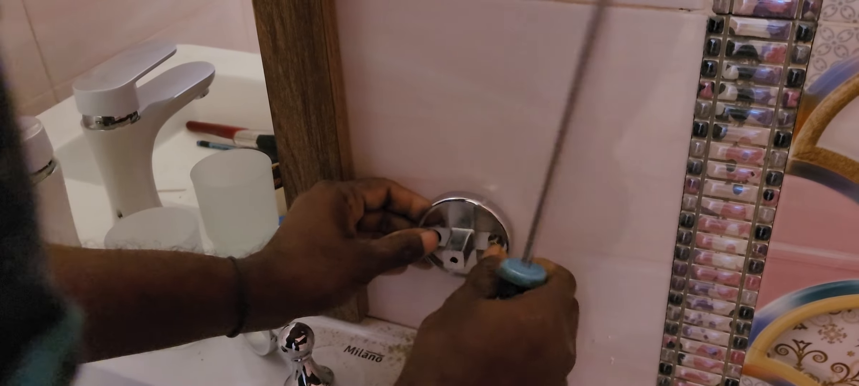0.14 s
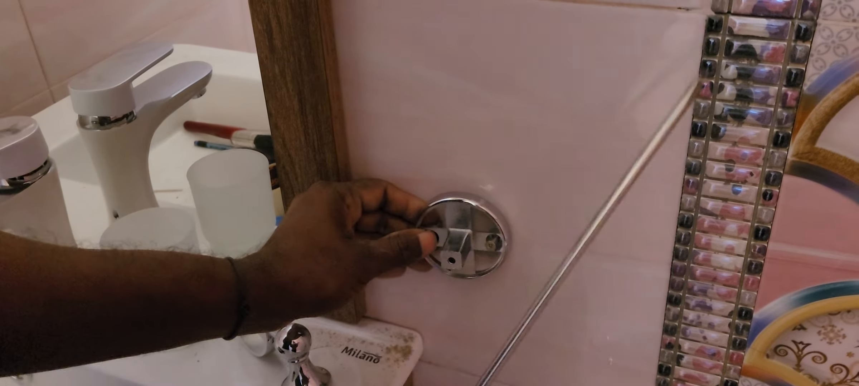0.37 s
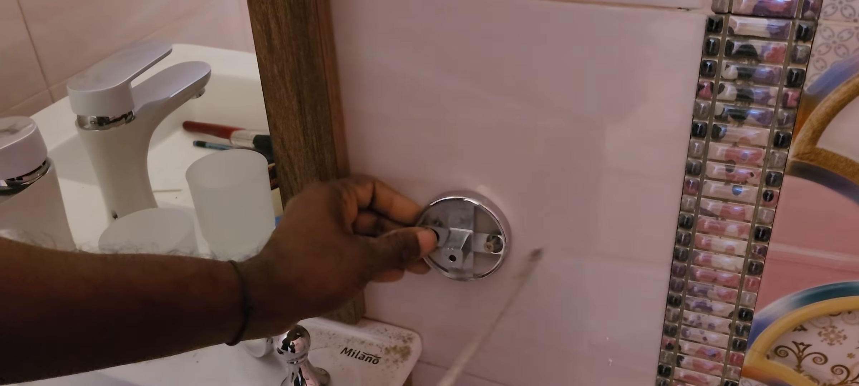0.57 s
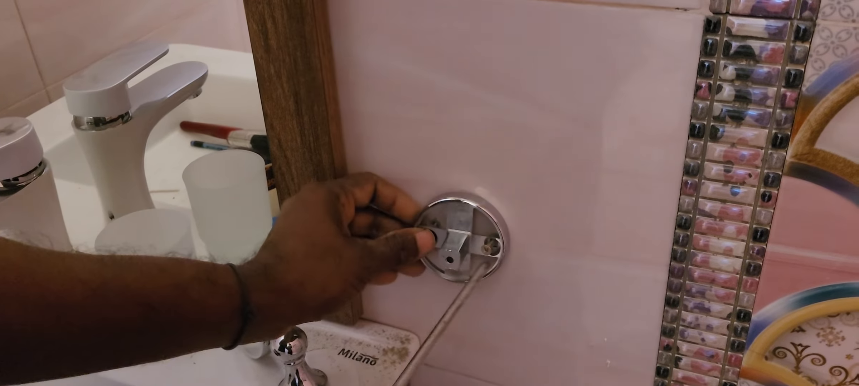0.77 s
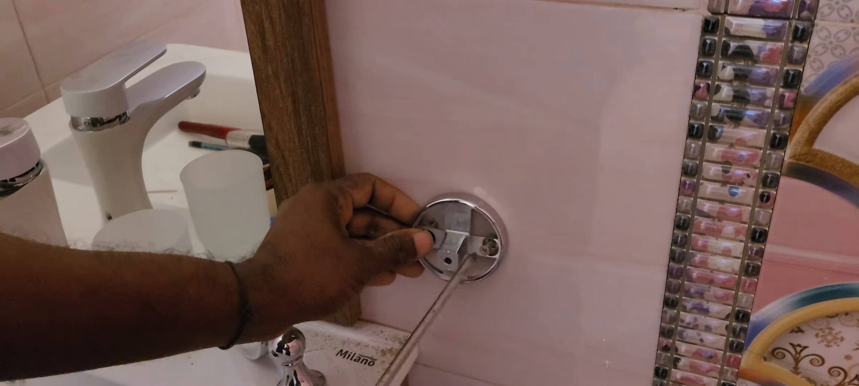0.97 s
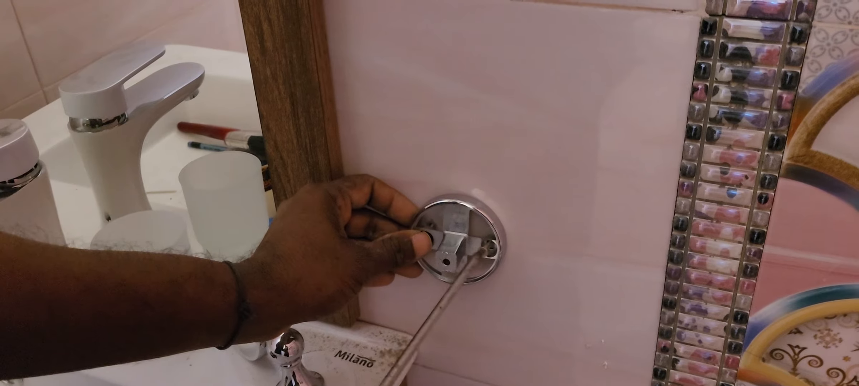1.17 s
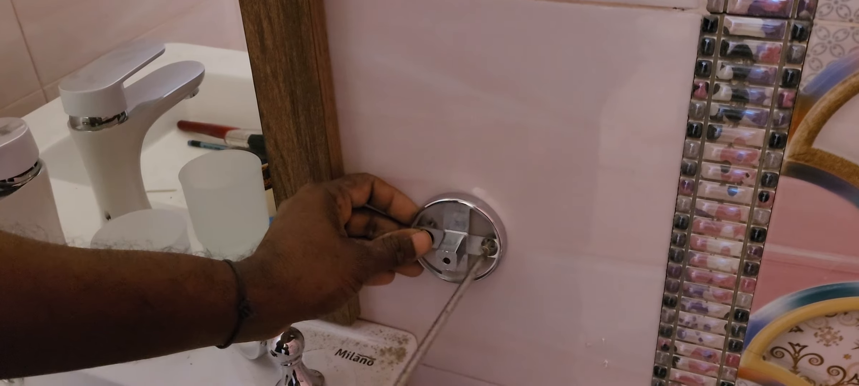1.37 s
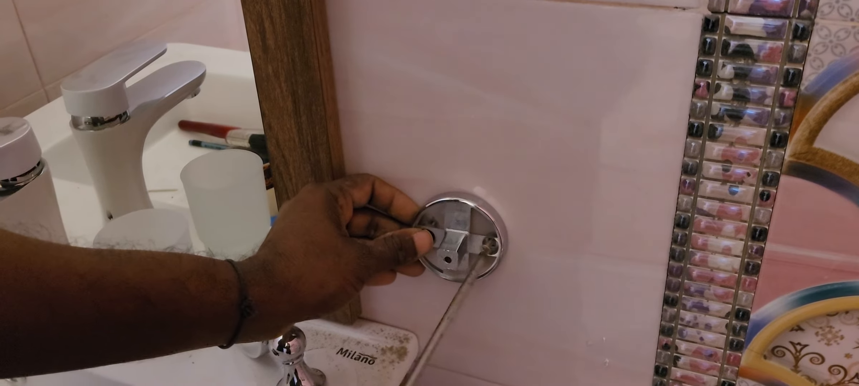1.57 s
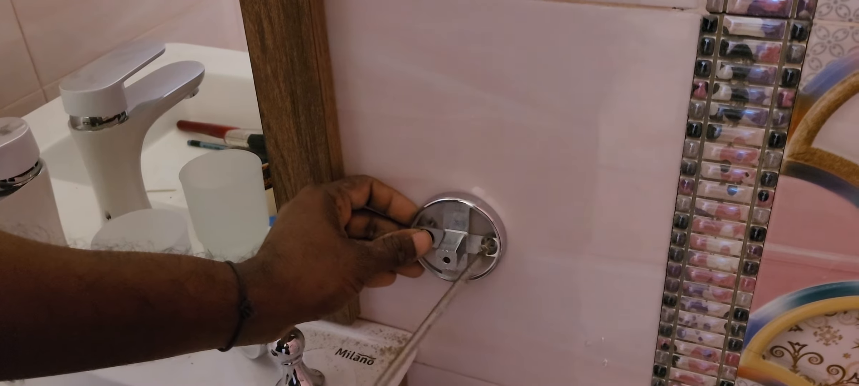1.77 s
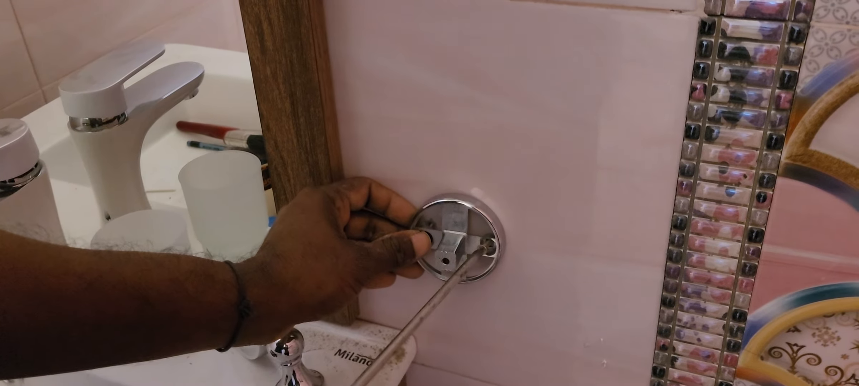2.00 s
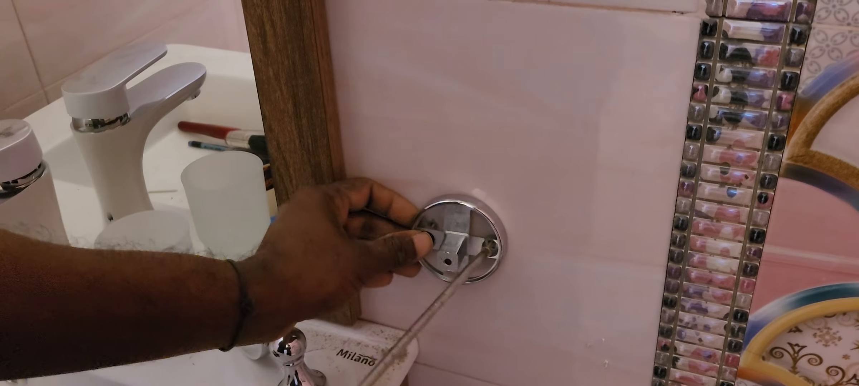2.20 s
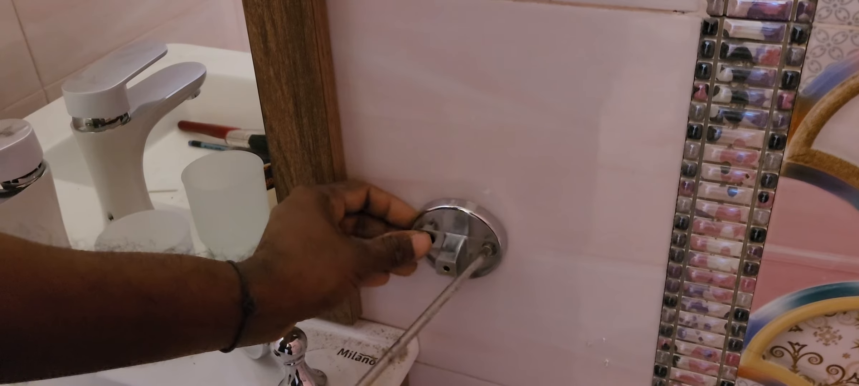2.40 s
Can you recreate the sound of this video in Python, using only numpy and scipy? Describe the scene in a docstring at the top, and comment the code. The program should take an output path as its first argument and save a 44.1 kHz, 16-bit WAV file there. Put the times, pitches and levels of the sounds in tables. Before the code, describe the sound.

A screwdriver touches a small metal wall plate in a tiled bathroom, heard close. Sharp, bright ticks come at 0.1, 0.55 and 0.7 seconds, while a muffled low rumble swells, strongest around 0.4 to 0.8, with thin hiss and a faint high whistle, fading by 1.3. Faint ticks follow, then clicks at 1.92 and 2.13 and a louder ringing clink at 2.37, with soft wall thuds.

```python
"""Screwdriver on a wall plate

A screwdriver tip taps and slips on a screw in a small metal wall plate, in a tiled bathroom.
Each touch is a noise grind, a ringing knock and the plate's modes; three later ones also thud in the wall.
Under them a low rumble, perhaps a vehicle passing outside, swells and fades as noise through the
room's low resonances. Thin hiss with faint whistles, one of them gliding, lies on top; all of it
is noise too, like the quiet room tone that stays below.
"""
import sys
import numpy as np
from scipy import signal
from scipy.fft import rfft, irfft
from scipy.io import wavfile

SR = 44100
rng = np.random.default_rng(int(sys.argv[2]) if len(sys.argv) > 2 else 0)


def file_out(sig):
    """Save sig as 16-bit WAV at sys.argv[1]."""
    # one column per channel
    cols = np.atleast_2d(sig).T
    # limit, then scale
    lim = np.clip(cols, -1, 1)
    pcm = np.round(lim * 32767).astype(np.int16)
    wavfile.write(sys.argv[1], SR, pcm)


def linear_from_db(decibels):
    """Turn decibels (scalar or array-like) into linear amplitude factors; 0 gives 1."""
    return 10 ** (np.asarray(decibels, float) / 20)


N = 108045

# touches of the tip: t/s, level/dB, centre f/Hz, half spread/octaves, grind time constant/s,
# knock f/Hz, knock level re grind/dB, its ring re knock/dB, plate level re touch/dB, left minus right/dB
TOUCHES = [(0.0646, -28, 9800, 0.6, 0.0013, 8260, -10, -27, -23, -4.5),
           (.137, -37, 13000, 0.24, 0.00091, 11800, 1, -51, -43.5, -14),
           (0.141, -27.5, 8700, 0.94, 0.004, 8060, 3, -23, -42.5, -1.5),
           (0.543, -28, 8050, 1.2, 0.0035, 3580, 13.5, -32, -39, -1.5),
           (0.6755, -31.5, 11200, 0.64, 0.0016, 6400, -3, -30, -29, -2),
           (1.195, -55, 6000, 0.68, .002, 5800, -10, -22, -35, -3),
           (1.279, -40.5, 6940, 0.23, 0.0026, 5050, 7.5, -36, -23, -1),
           (1.821, -59.5, 9100, 0.88, 0.0073, 8400, -10, -30, -37, -3),
           (1.912, -46.5, 7900, .8, 0.011, 6200, -10, -33, -37, -5),
           (1.9218, -26.5, 7450, 1.1, 0.0027, 5340, 2, -28, -24, 3.5),
           (1.93, -28, 5900, 0.77, 0.0025, 3700, 0, -25, -41, -9),
           (2.129, -28, 8300, 0.46, 0.0026, 5200, 0.5, -27, -25, -1.5),
           (2.259, -57, 11460, 0.77, 0.055, 8000, -8, -30, -20, -2),
           (2.3658, -24, 4900, 0.92, 0.0049, 8500, 7, -35, 5.5, -5)]
# mode clusters of the metal plate: f/Hz, width/Hz, relative level/dB, t60/s
PLATE_MODES = [(2820, 290, -10, 0.12), (3210, 120, 2.5, 0.12), (3077, 110, 4.5, 0.1), (3800, 320, -13, .15),
               (4130, 250, 0.5, 0.17), (4620, 260, 8, 0.12), (5260, 400, -6, 0.064), (6930, 100, -10, .15),
               (7800, 88, -6, 0.13), (10300, 200, -15, 0.59), (11420, 60, -24, 0.26),
               (11820, 51, -5, 0.099), (12600, 40, -16, .2), (13110, 52, -16, .4), (13500, 40, -25, .4),
               (14570, 70, -9, 0.088)]
# low modes of the wall: f/Hz, relative level/dB, t60/s
WALL_MODES = [(173.3, -2, 0.58), (207, -8.5, 0.45), (243, 1.5, 0.24), (390.7, -1, 0.29)]
# the wall thuds with three of the later touches: t/s, level/dB
WALL_THUDS = [(1.926, -51.5), (2.128, -46.5), (2.37, -45.5)]
# decay of the bathroom: f/Hz, t60/s
BATHROOM_T60 = [(300, 1), (2000, 0.66), (5000, 0.52), (10000, 0.27), (16000, 0.39)]
# swells of the rumble: t/s, bass level/dB, body level/dB, upper body level/dB
RUMBLE_LEVELS = [(0.0, -51, -36, -47), (0.14, -48.5, -39.5, -54.5), (0.17, -47, -27.5, -42.5),
                 (0.2, -37.5, -28, -46.5), (0.27, -43, -23.5, -39.5), (0.37, -37, -23.5, -41.5),
                 (0.4, -40, -25, -33.5), (0.43, -33, -17, -31.5), (0.51, -37, -20.5, -34.5),
                 (0.57, -36, -16, -33), (0.67, -31.5, -19, -37.5), (0.78, -35, -20.5, -41),
                 (0.81, -44, -20.5, -45), (0.85, -35, -26.5, -43), (1.25, -49.5, -43, -57.5),
                 (1.52, -80, -50, -65.5), (2.13, -76, -64.5, -65), (2.45, -75, -51, -61)]
# swells of the hiss: t/s, lower treble level/dB, upper treble level/dB
HISS_LEVELS = [(0.0, -60.5, -68), (0.124, -54, -68), (0.242, -52, -58), (0.324, -55, -59.5),
               (0.642, -52.5, -54.5), (0.844, -51.5, -58), (1.032, -58.5, -62), (1.408, -76, -99),
               (1.5, -94, -92)]
# colour of each rumble and hiss band: f/Hz, relative level per Hz/dB
BASS_COLOUR = [(12, -63), (20, -56), (37, -20), (59, -14.5), (86, -2.5), (124, 3), (140, -7), (180, -26),
               (310, -120)]
BODY_COLOUR = [(76, -42.5), (130, -15.5), (227, -2.5), (352, -3), (403, -6.5), (480, -8), (650, -24.5),
               (840, -39), (1430, -120)]
UPPER_BODY_COLOUR = [(350, -21), (600, 0.5), (690, 0), (792, 1.5), (959, -3), (1300, -17), (1690, -66),
                     (2860, -120)]
LOWER_TREBLE_COLOUR = [(710, -16), (1200, -5.5), (1530, -4), (1630, -4.5), (2890, -11.5), (3340, -15),
                       (4160, -13.5), (4550, -10), (6200, -22), (8060, -47), (13600, -120)]
UPPER_TREBLE_COLOUR = [(3530, -14), (6000, -5.5), (6910, -1.5), (8850, -18), (10900, -13), (12800, -23.5),
                       (13100, -8.5), (13900, -16), (15800, -30)]
# low resonances of the room: f/Hz, width/Hz, lift/dB
ROOM_BOOMS = [(55.8, 7.6, 6.5), (98, 5, -1), (177.6, 4, 6.5), (219, 4.6, -3.5), (233.2, 5.6, 16.5),
              (269.8, 5.1, 11), (345.94, 4.4, 11), (360, 29, 3), (369, 12, 3), (442.5, 4.9, 14.5),
              (491.5, 6.9, 10.5), (550, 6.3, 13.5), (618.6, 9.8, 11.5), (717, 7.2, 2), (773, 9.2, 4.5),
              (867, 6, 9), (936, 10, 11), (975, 12, 9.5)]
# faint steady-pitched whistles in the hiss: f/Hz, width/Hz, lift/dB
HISS_WHISTLES = [(2870, 60, 5), (4600, 90, 7), (6260, 60, 5), (6900, 90, 7), (13500, 130, 9)]
# one thin whistle holds, climbs slowly, then drops quickly and fades: t/s, f/Hz, level/dB
WHISTLE_GLIDE = [(.3, 10800, -89), (.35, 10800, -61), (.45, 10800, -74), (.63, 10860, -71),
                 (.85, 10950, -74), (1.0, 11150, -74), (1.11, 11550, -73), (1.16, 10600, -78),
                 (1.19, 10000, -93)]
# colour of the room tone: f/Hz, relative level per Hz/dB
ROOM_TONE_COLOUR = [(12, -78), (20, -35), (93, -12), (133, -20.5), (233, 2.5), (308, -1), (365, 1),
                    (586, -12.5), (819, -23), (942, -12.5), (1210, -16), (1430, -12), (2240, -17.5),
                    (2500, -18.5), (3910, -27.5), (4760, -22), (15800, -55.5)]
# hums within the room tone: f/Hz, width/Hz, lift/dB
ROOM_TONE_HUMS = [(201, 6.8, 3), (264, 29, -7.5), (375, 15, -8), (462, 23, -3), (696, 44, 4),
                  (935, 40, 9.5), (1455, 14.4, 11), (1630, 90, 9.5), (3700, 220, 10), (5200, 340, 0.5),
                  (7350, 130, 10)]
# stereo image of the noise layers: f/Hz, left-right likeness (1 is mono, 0 unrelated)
STEREO_LIKENESS = [(60, 0.96), (130, 0.94), (290, 0.96), (640, 0.55), (1410, -0.086), (3100, -0.01),
                   (6820, 0.0027), (15000, 0.11)]
# stereo balance of the noise layers: f/Hz, left minus right/dB
STEREO_LEAN = [(60, -4), (150, 1), (380, 0), (950, 2.5), (2380, -7.5), (5980, -1.5), (15000, -3.5)]

SKIRT_DB = -13.5   # broad floor of each grind, above 1200 Hz
KNOCK_T60_S, KNOCK_RING_T60_S, KNOCK_RING_WIDTH_HZ = .007, 0.42, 190
PLATE_TRIM_DB, PLATE_SINE_DB = -16, -2.5   # all modes; their pure sines re their noise
RIGHT_LAG_S, PLATE_LAG_S = .000342, .00012   # right side behind left: tip, plate
WALL_RISE_S, WALL_MODE_WIDTH_HZ = 0.031, 9.2
TAIL_DB, ECHO_S, ECHO_DB = -0.5, .005, -9
FLICKER_DB, FLICKER_PER_S = 1.5, 9.07
HISS_FADE_DB_PER_S = 31.5   # after its last point
GLIDE_WIDTH_HZ, GLIDE_FLICKER_DB, GLIDE_FLICKER_PER_S = 190, 3, 6.7
ROOM_TONE_DB = -58
TOP_HZ = 15850


def taps():
    """Each touch excites three things: a short scraping grind, a ringing knock and the plate's modes."""
    out = np.zeros((2, N + SR))
    right_lag = int(RIGHT_LAG_S * SR)
    for s, db, centre_hz, spread, grind_s, knock_hz, knock_db, ring_db, plate_db, pan_db in TOUCHES:
        tip = grind(centre_hz, spread, grind_s) + linear_from_db(knock_db) * knock(knock_hz, ring_db)
        plate = plate_ring()
        for side, sign in enumerate((1, -1)):
            pan = sign * pan_db / 2
            at = int(s * SR) + side * right_lag
            out[side, at:at + len(tip)] += tip * linear_from_db(db + pan) / 2
            at = int((s + side * PLATE_LAG_S) * SR)
            out[side, at:at + len(plate)] += plate * linear_from_db(db + plate_db + pan) / 2
    return out[:, :N]


def grind(centre_hz, spread, time_constant_s):
    """Metal scraping metal: a burst of noise humped around its centre, over a broad skirt."""
    def hump(hz):
        octaves = np.log2((hz + 1) / centre_hz) / spread
        return linear_from_db(SKIRT_DB) * (hz > 1200) + 1 / (1 + octaves ** 4)
    return dying(hump, np.log(1000) * time_constant_s)


def knock(hz, ring_db):
    """A hit: a very short sine, with a narrow band of noise ringing on faintly at the same pitch."""
    ring = dying(peak(hz, KNOCK_RING_WIDTH_HZ), KNOCK_RING_T60_S)
    return struck(hz, KNOCK_T60_S) + linear_from_db(ring_db) * ring


def plate_ring():
    """Each mode cluster of the plate is a narrow noise and a pure sine that die away together."""
    out = 0
    for hz, width, level_db, t60 in PLATE_MODES:
        mode = dying(peak(hz, width), t60) + linear_from_db(PLATE_SINE_DB) * struck(hz, t60)
        out = out + linear_from_db(level_db + PLATE_TRIM_DB) * mode
    return out


def thuds():
    """The wall's low modes swell in dully, slightly late, then die away."""
    out = np.zeros(N + SR)
    for s, db in WALL_THUDS:
        thud = sum(linear_from_db(level_db) * dying(peak(hz, WALL_MODE_WIDTH_HZ), t60)
                   for hz, level_db, t60 in WALL_MODES)
        rise = 1 - np.exp(-np.arange(len(thud)) / SR / WALL_RISE_S)
        out[int(s * SR):][:len(thud)] += linear_from_db(db) * thud * rise
    return out[:N]


def bathroom(x):
    """One early echo off the tiles, and a dense tail that dies band by band, unrelated on each side."""
    t, tail = np.arange(SR) / SR, 0
    edges = 100 * 2. ** np.arange(0, 7.6, .5)   # half octaves
    for low, high in zip(edges, edges[1:]):
        sos = signal.butter(2, [low, high], "band", fs=SR, output="sos")
        band = signal.sosfilt(sos, rng.standard_normal((2, SR)))
        tail = tail + band * linear_from_db(-60 * t / at_hz(BATHROOM_T60, np.sqrt(low * high)))
    tail = tail / np.sqrt(np.sum(tail ** 2) / 2)
    tail = linear_from_db(TAIL_DB) * tail * np.minimum(t / ECHO_S, 1)
    tail[:, int(ECHO_S * SR)] += linear_from_db(ECHO_DB)
    return signal.fftconvolve(x, tail, axes=1)[:, :N]


def rumble():
    """Three low bands of noise swell and fade, boosted or dipped at the room's resonances."""
    return swelling_bands(RUMBLE_LEVELS, (BASS_COLOUR, BODY_COLOUR, UPPER_BODY_COLOUR))


def hiss():
    """Two treble bands of noise, with narrow lifts heard as whistles, fade out at the end."""
    return swelling_bands(HISS_LEVELS, (LOWER_TREBLE_COLOUR, UPPER_TREBLE_COLOUR), HISS_FADE_DB_PER_S)


def gliding_whistle():
    """A narrow band of noise, carried along a pitch curve by shifting slow noise up to it."""
    t = np.arange(N) / SR
    s, hz, db = np.transpose(WHISTLE_GLIDE)
    sos = signal.butter(2, GLIDE_WIDTH_HZ / 2, fs=SR, output="sos")
    in_phase, quadrature = rms_one(signal.sosfilt(sos, rng.standard_normal((2, 2, N))))
    phase = 2 * np.pi * np.cumsum(np.interp(t, s, hz)) / SR
    level = np.interp(t, s, db) + GLIDE_FLICKER_DB * drift(GLIDE_FLICKER_PER_S)
    return linear_from_db(level) * (in_phase * np.cos(phase) + quadrature * np.sin(phase))


def room_tone():
    """Steady quiet noise, mostly low, with soft hums."""
    return linear_from_db(ROOM_TONE_DB) * coloured(ROOM_TONE_COLOUR, ROOM_TONE_HUMS)


def swelling_bands(rows, colours, end_fade_db_per_s=0):
    """Bands of resonant noise, each on its level curve with a slight flicker of its own."""
    out, t = 0, np.arange(N) / SR
    s, *levels = np.transpose(rows)
    fade = end_fade_db_per_s * np.maximum(t - s[-1], 0)
    for db, colour in zip(levels, colours):
        level = np.interp(t, s, db) - fade + FLICKER_DB * drift(FLICKER_PER_S)
        out = out + linear_from_db(level) * coloured(colour, ROOM_BOOMS + HISS_WHISTLES)
    return out


def coloured(spectrum, lifts):
    """Stereo noise with a spectrum, raised or dipped at resonances; the mid has rms 1."""
    hz = np.arange(N // 2 + 1) * SR / N
    lift = sum(db * peak(f, width)(hz) for f, width, db in lifts)
    alike = np.clip(at_hz(STEREO_LIKENESS, hz), -.99, .99)
    mid, side = rfft(rng.standard_normal((2, N))) * linear_from_db(at_hz(spectrum, hz) + lift)
    pair = np.sqrt(1 + alike) * mid + np.sqrt(1 - alike) * side * [[1], [-1]]
    lean = linear_from_db(at_hz(STEREO_LEAN, hz) / 2 * [[1], [-1]])
    out = irfft(pair * lean, N)
    return out / np.sqrt(np.mean(out.mean(axis=0) ** 2))


def dying(shape, t60):
    """Half a second of noise with a spectral shape (function of Hz), dying away from rms 1."""
    span = SR // 2
    spectrum = rfft(rng.standard_normal(span)) * shape(np.arange(span // 2 + 1) * SR / span)
    return rms_one(irfft(spectrum, span)) * linear_from_db(-60 * np.arange(span) / SR / t60)


def struck(hz, t60):
    """Half a second of a dying sine."""
    t = np.arange(SR // 2) / SR
    return np.sin(2 * np.pi * hz * t) * linear_from_db(-60 * t / t60)


def peak(centre_hz, width_hz):
    """Shape of a doubled resonance, as wide as given at half its height."""
    return lambda hz: 1 / (1 + (2 * (hz - centre_hz) / width_hz) ** 2)


def drift(rate):
    """Slow chance: straight lines between random points of spread 1, rate points a second."""
    knots = rng.standard_normal(200)
    return np.interp(np.arange(N) / SR * rate, np.arange(len(knots)), knots)


def rms_one(x):
    """Scale to rms 1."""
    return x / np.sqrt(np.mean(x ** 2) + 1e-20)


def at_hz(points, hz):
    """Read a table along log frequency."""
    table_hz, values = np.transpose(points)
    return np.interp(np.log(hz + 1), np.log(table_hz), values)


def scene():
    """Taps with their room and wall, over rumble, hiss, whistle and room tone."""
    tip = taps()
    return tip + bathroom(tip) + thuds() + rumble() + hiss() + gliding_whistle() + room_tone()


def top_cut(x):
    """A second, higher low-pass: little passes above about 16.75 kHz."""
    return signal.sosfilt(signal.butter(12, 16750, fs=SR, output="sos"), x)


def record(dry):
    """A steep low-pass cuts the top of the mix."""
    low_pass = signal.ellip(8, .5, 25, TOP_HZ, fs=SR, output="sos")   # ripple, stopband in dB
    mix = signal.sosfilt(low_pass, dry)
    return top_cut(mix)


dry = scene()
out = record(dry)
file_out(out)
```